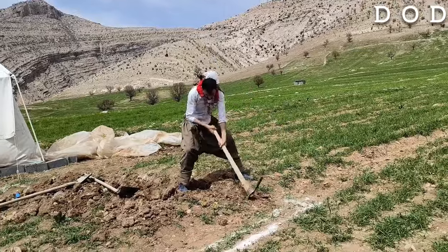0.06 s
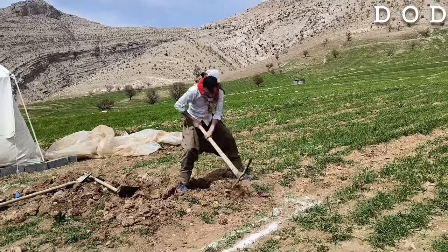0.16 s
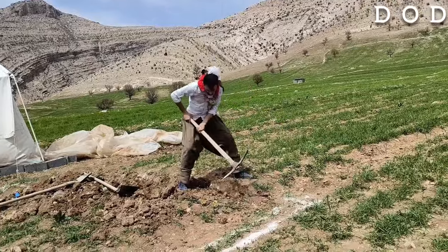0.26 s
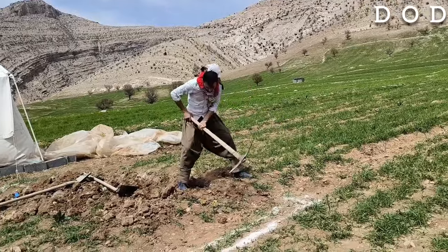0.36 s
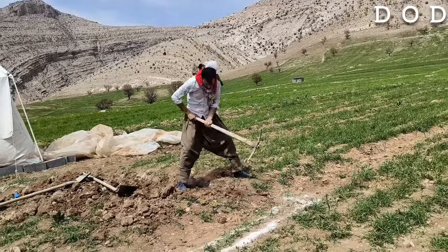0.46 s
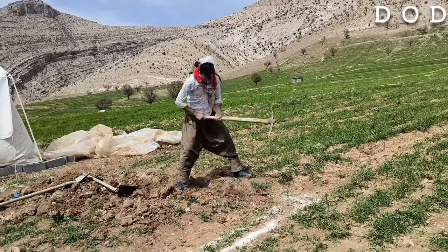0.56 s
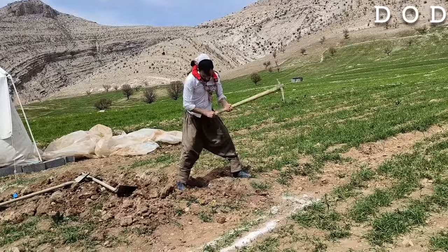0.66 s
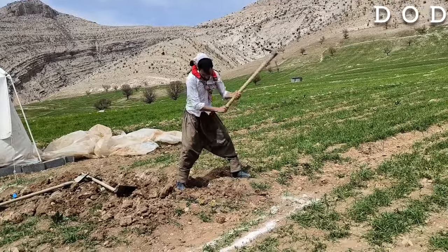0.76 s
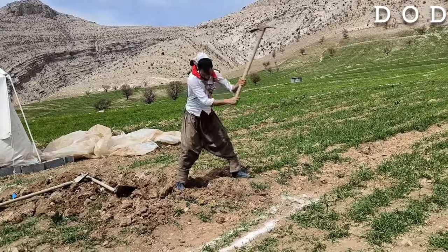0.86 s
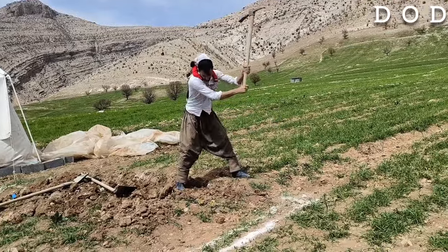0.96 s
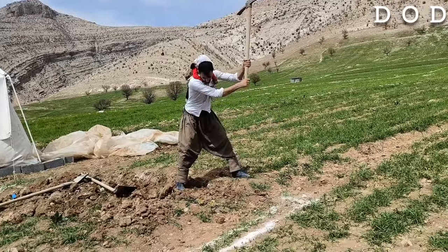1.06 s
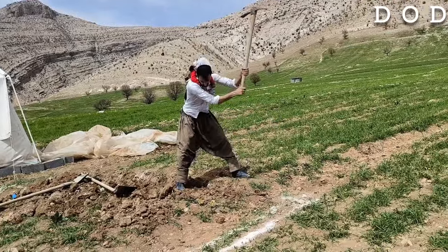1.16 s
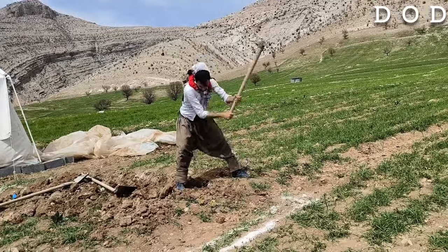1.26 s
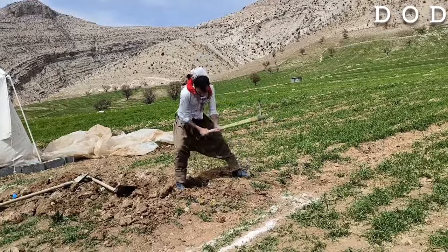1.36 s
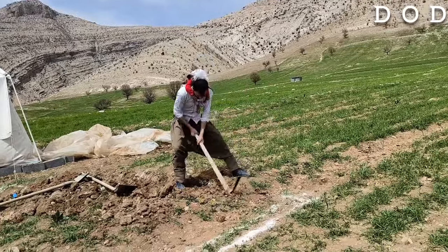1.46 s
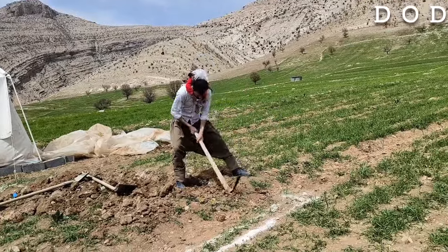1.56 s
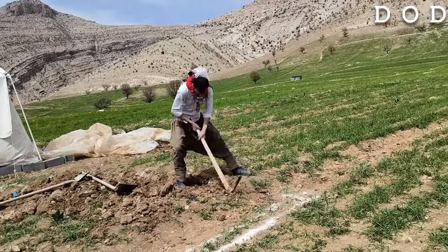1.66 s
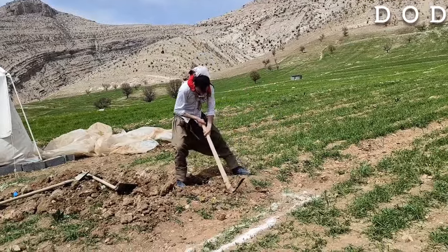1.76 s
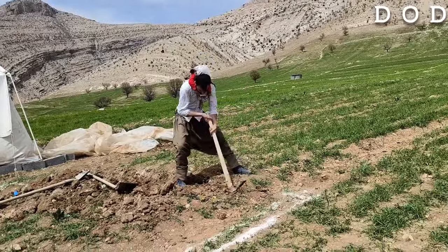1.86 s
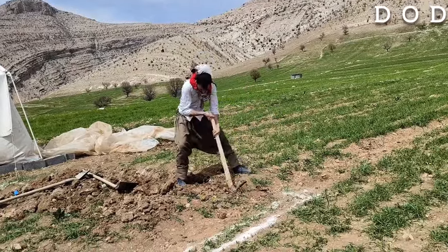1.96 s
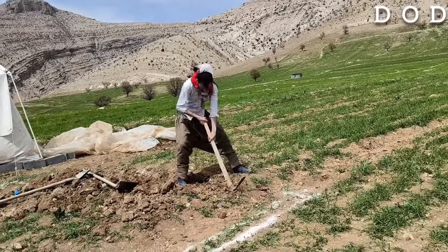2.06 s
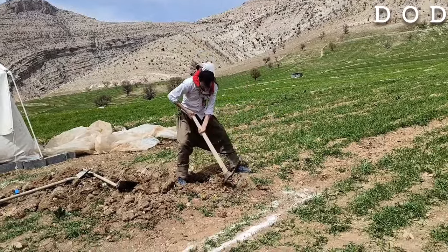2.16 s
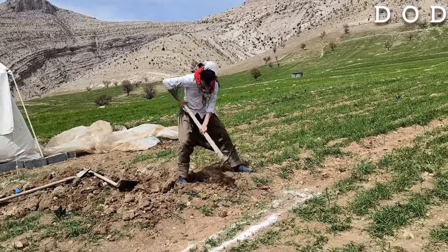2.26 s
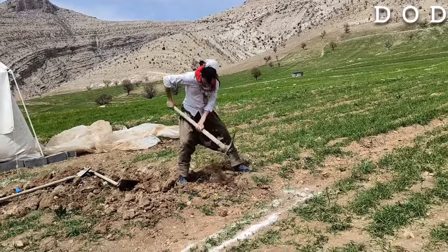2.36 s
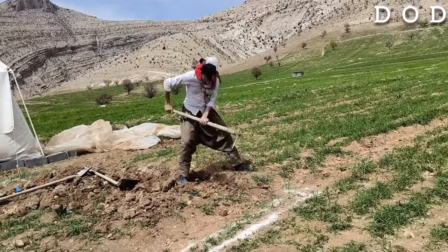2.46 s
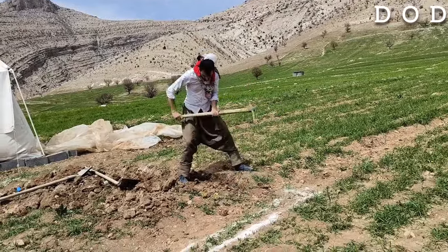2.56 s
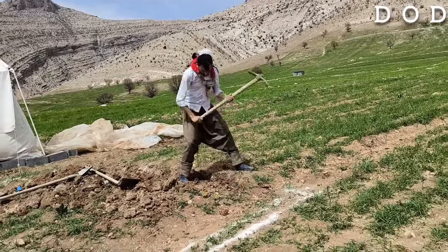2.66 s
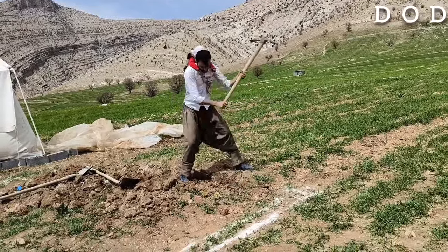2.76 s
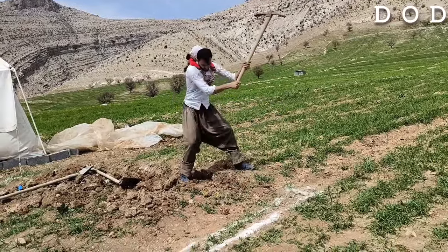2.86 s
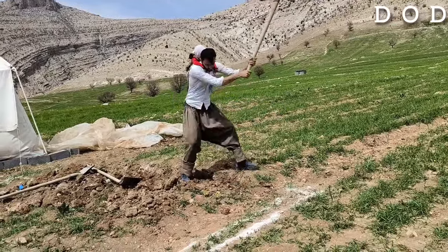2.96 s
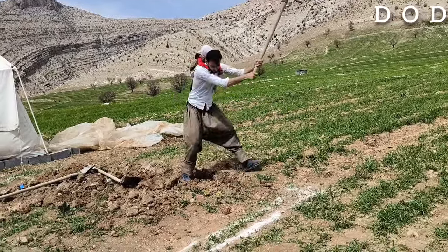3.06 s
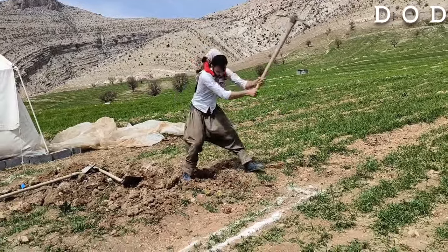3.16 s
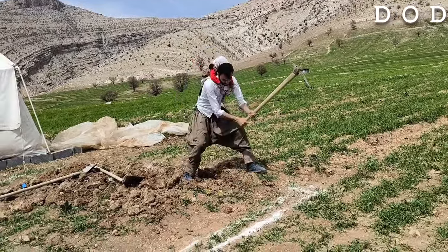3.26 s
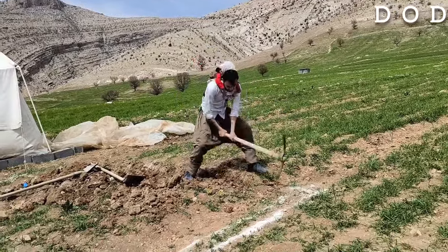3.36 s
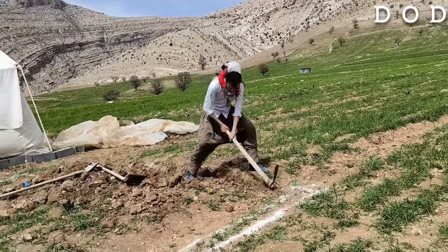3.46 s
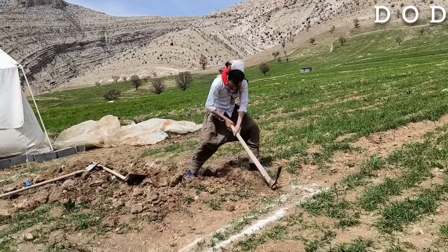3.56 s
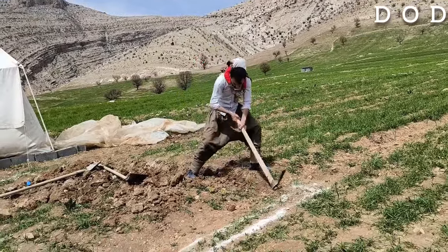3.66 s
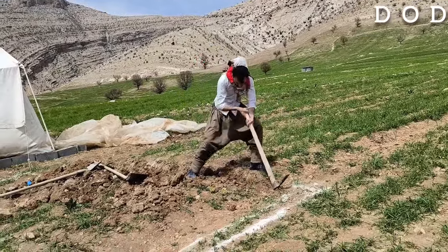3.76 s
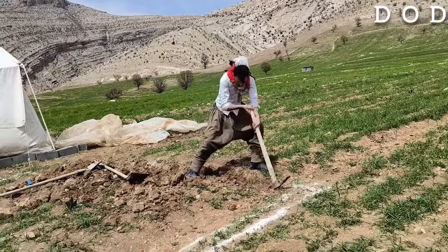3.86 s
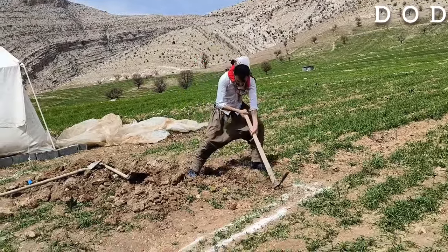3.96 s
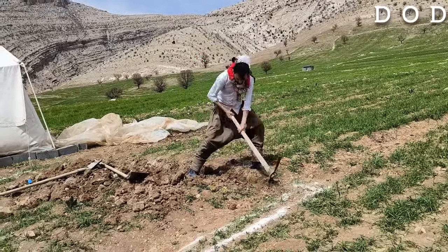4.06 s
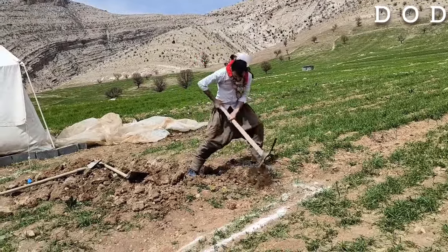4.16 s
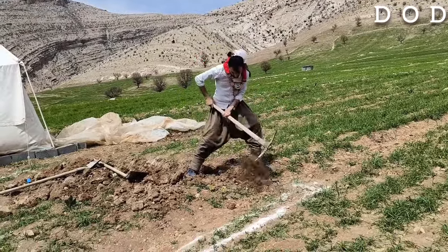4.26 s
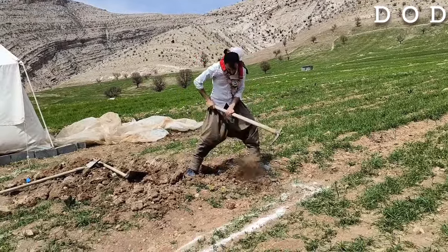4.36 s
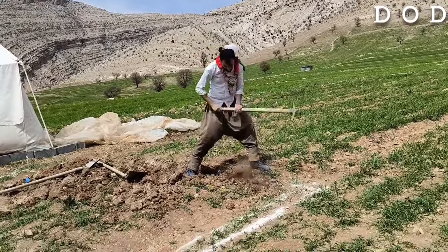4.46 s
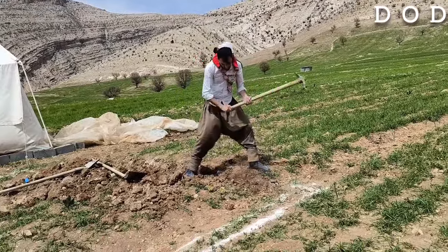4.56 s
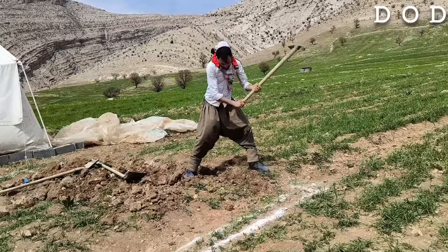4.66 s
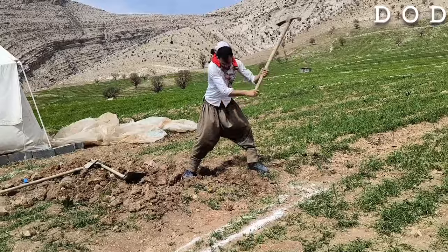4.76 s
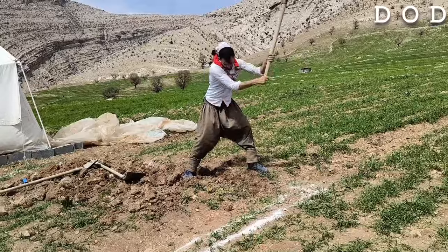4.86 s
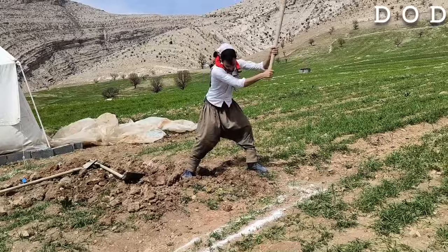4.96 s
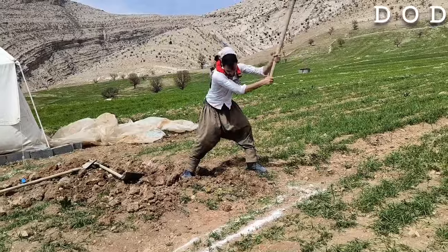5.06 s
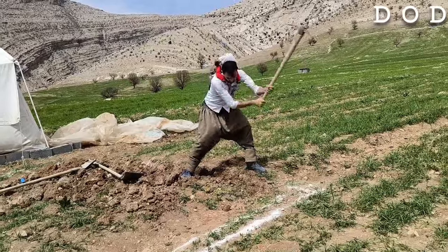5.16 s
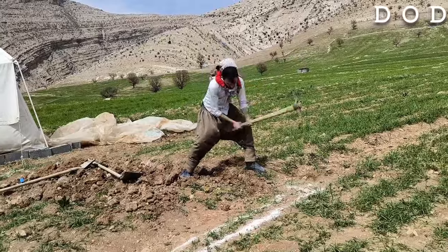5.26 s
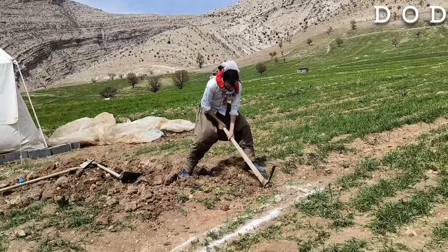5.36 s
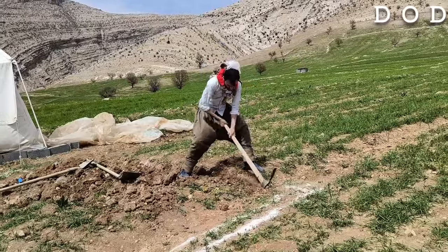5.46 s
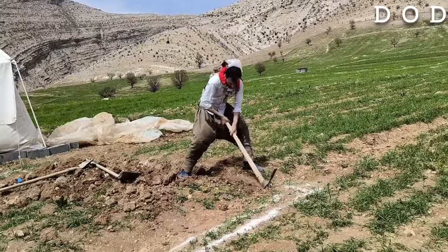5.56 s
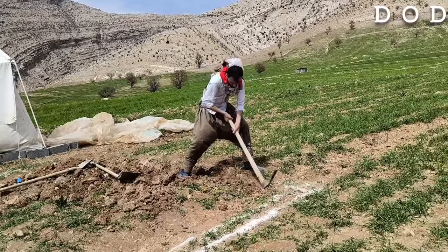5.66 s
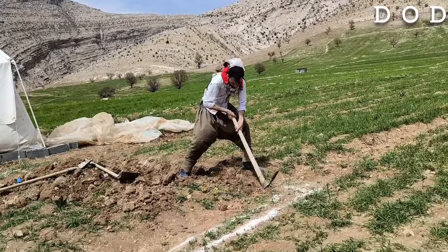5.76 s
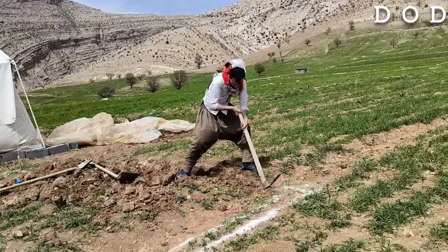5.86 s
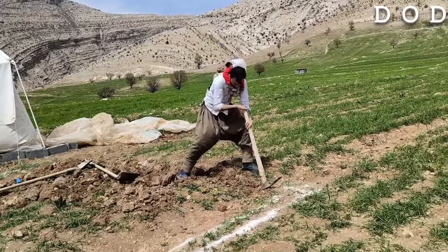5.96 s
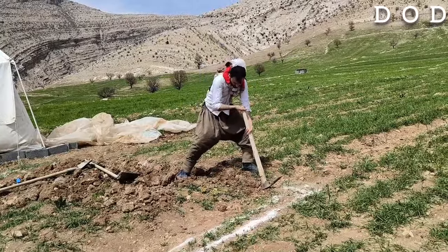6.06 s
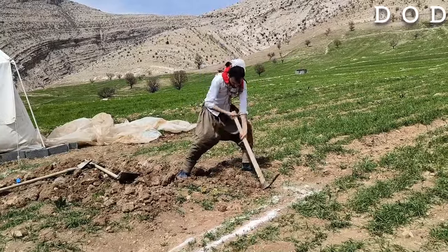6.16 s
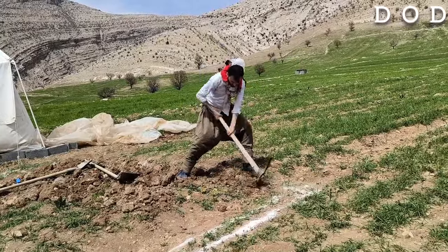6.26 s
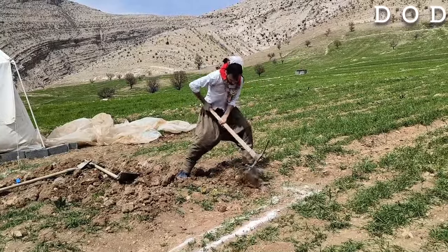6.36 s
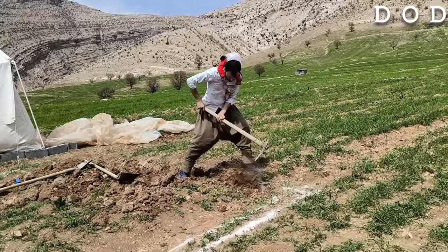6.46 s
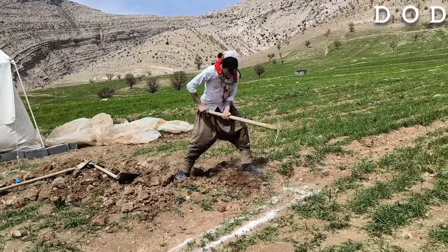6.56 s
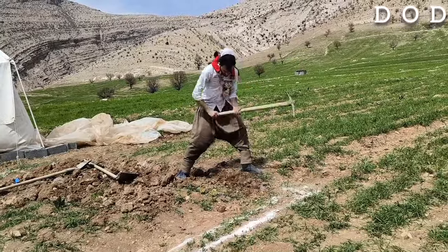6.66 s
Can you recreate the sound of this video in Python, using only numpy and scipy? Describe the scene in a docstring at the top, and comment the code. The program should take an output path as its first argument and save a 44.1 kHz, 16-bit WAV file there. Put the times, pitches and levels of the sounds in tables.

```python
"""A steel pick strikes stony soil three times on an open hillside and is levered out; grit runs off the blade.
Each stony contact is a jerky burst of noise that also rings the steel head, with a low thud through the ground.
Pebbles are short noise bursts; loose soil is many tiny clicks with an airy swish.
Wind is lumpy low noise with flutter and pops on the two ports of a hand-held phone, far harder on the left.
A faint hillside and circuit hiss lie underneath, and the phone's gain control turns loud stretches down."""
import sys
import numpy as np
from scipy import signal
from scipy.fft import rfft, irfft, next_fast_len
from scipy.io import wavfile
from scipy.ndimage import map_coordinates

SR = 44100
rng = np.random.default_rng(int(sys.argv[2]) if len(sys.argv) > 2 else 0)


def transcribe(signal):
    """Save signal, clipped to [-1, 1], as a 16-bit WAV file at the path in sys.argv[1]."""
    frames = np.atleast_2d(signal).T
    limited = np.clip(frames, -1, 1)
    pcm = np.round(limited * 32767).astype(np.int16)
    wavfile.write(sys.argv[1], SR, pcm)


N = 296384
T = np.arange(N) / SR  # time of every sample, s

# All levels below are those before the phone's own processing.
# steady part of the wind on each port: t/s, level/dB
WIND_LEFT = [(0, -35), (.12, -19.5), (.36, -14.5), (.6, -15), (.8, -16.5), (1.05, -11.5), (1.4, -19.5),
             (1.6, -20.5), (1.81, -45), (1.95, -27.5), (2.75, -27), (2.95, -34.5), (3.3, -26), (3.45, -47),
             (4.0, -68), (4.33, -31.5), (4.65, -61), (6.15, -52.5), (6.45, -31.5), (6.72, -39)]
WIND_RIGHT = [(0, -61.5), (.33, -45.5), (.42, -36), (.5, -52.5), (1.5, -44), (1.7, -43), (2.18, -66),
              (2.33, -31), (2.42, -45), (2.62, -35), (2.93, -28), (3.25, -52.5), (4.5, -69), (6.2, -62.5),
              (6.38, -40), (6.47, -51), (6.6, -35.5), (6.72, -36)]
# separate thumps of air on the windward (left) port: t/s, level/dB
THUMPS = [(0.124, -23), (.24, -14), (0.288, -10), (0.449, -5.5), (0.649, -13), (0.704, -10), (.884, -5.5),
          (1.027, -11), (1.134, -23.5), (1.28, -15.5), (1.335, -13.5), (1.459, -18), (1.559, -16),
          (2.034, -22.5), (2.12, -15.5), (2.292, -21.5), (2.43, -19.5), (2.692, -19.5), (2.86, -30),
          (3.018, -18), (3.102, -19.5), (3.229, -27.5), (3.277, -26.5), (4.051, -37.5), (4.173, -38),
          (4.328, -37), (4.467, -36), (4.598, -37.5), (5.163, -36.5), (5.887, -42.5), (6.282, -32.5),
          (6.466, -28.5), (6.613, -25), (6.644, -31), (6.689, -18)]
# single eddies that pop on one port: t/s, peak/dB, sharpness/Hz, port (0 left, 1 right)
POPS = [(0.0651, -6.5, 748, 1), (.134, -24.5, 906, 1), (0.284, -6, 383, 0), (.37, -20.5, 500, 1),
        (0.434, -4.5, 473.5, 0), (0.447, 0.5, 580, 0), (0.645, -6.5, 352.8, 0), (0.704, -5.5, 477, 0),
        (0.875, -0.5, 500, 0), (1.029, -10, 300, 0), (2.119, -21, 303.2, 0), (2.29, -13.5, 303, 0),
        (2.445, -13, 300, 0), (2.644, -22, 695, 1), (2.69, -13.5, 302, 0), (2.999, -18, 304, 0),
        (3.09, -13, 244, 0), (3.278, -15, 214, 0), (5.977, -25, 1470, 1), (6.684, -17, 296, 0)]
# colour of the low wind noise: f/Hz, level/dB
EDDIES = [(25, -75.5), (42, -70.5), (60, -0.5), (100, 9.5), (140, 6.5), (210, -0.5), (330, -25.5),
          (600, -83.5)]
# colour of the wind flutter above it: f/Hz, level/dB
FLUTTER = [(60, -26.5), (150, -6.5), (250, 5.5), (400, -6.5), (700, -31), (1200, -47.5), (3000, -77.5)]
# colour of the open hillside: f/Hz, level/dB
HILLSIDE = [(45, -15), (90, 2), (250, -4.5), (550, -4.5), (900, -16), (2000, -21.5), (4000, -21),
            (6500, -19.5), (7400, -26), (16000, -40)]
# colour of the circuit hiss: f/Hz, level/dB
CIRCUIT = [(3000, 4), (6000, 5), (7400, -13), (11000, 0), (13500, 0.5), (15500, -1)]
# loose soil and cloth in motion: centre t/s, spread/s (standard deviation), grit level/dB, swish level/dB
SOIL = [(0.168, 0.022, -56, -76), (0.302, 0.05, -58.5, -83), (.575, 0.058, -52.5, -75),
        (2.185, 0.015, -53.5, -70.5), (2.312, 0.065, -61.5, -62), (2.932, 0.069, -68, -63.5),
        (3.14, 0.019, -61, -80.5), (3.7, 0.21, -68, -76), (4.248, 0.023, -59.5, -77),
        (4.412, 0.11, -67, -67.5), (5.21, 0.027, -83, -65), (6.428, 0.021, -58.5, -76.5)]
# colour of the grit: f/Hz, level/dB
GRIT = [(300, -15.5), (900, -1), (2000, -4), (4500, 7.5), (7000, 1.5), (10000, -5.5), (16000, -24.5)]
# colour of the swish: f/Hz, level/dB
SWISH = [(4000, -22), (7500, -10), (11000, 0), (16000, -6)]
# pebbles and clods: t/s, level/dB, centre f/Hz
PEBBLES = [(.148, -46.5, 5090), (.61, -39, 6800), (1.618, -45.5, 3140), (2.1635, -38, 4270),
           (2.37, -55.5, 1980), (2.42, -48, 3050), (4.105, -49.5, 10940), (4.39, -44.5, 3070),
           (6.333, -38.5, 1275), (6.44, -48.5, 1590)]
# the point meets stone after stone as it sinks: t/s, level/dB, hardness/(dB per octave), t60/s, head ring/dB
CONTACTS = [(1.5061, -10, 3.5, 0.012, -27.5), (1.511, -12, -3.5, 0.055, -24.5),
            (1.5147, -12.5, 1, 0.042, -22), (1.5188, -8.5, 3, 0.022, -18), (1.538, -31.5, 4.5, 0.05, -28.5),
            (3.464, -29.5, 1.5, 0.036, -32.5), (3.4716, -5.5, 1.7, 0.013, -21), (3.477, -18, 0, 0.028, -21),
            (3.495, -34.5, 7, .03, -29.5), (5.4158, -8.5, 3, .01, -28), (5.419, -21.5, 2.5, .06, -23.5),
            (5.427, -17.5, -6.5, 0.024, -18), (5.439, -28.5, 3, 0.027, -24)]
# ringing notes of the steel head: f/Hz, level/dB, t60/s
HEAD_MODES = [(1990, -13, .024), (2340, -8, .013), (2720, -9, .018), (4350, -9, .016), (5820, -4, .019),
              (9705, -27, .11), (12070, -32, .035), (14000, -30, .045)]
# colour of crushed stone: f/Hz, level/dB
CRUSH = [(70, -32), (200, -4.5), (500, -4.5), (1200, -26.5), (3000, 1.5), (6000, 0), (8000, -1.5),
         (12000, -14), (16000, -23.5)]
# the blow arriving through the ground: t/s, level/dB
THUDS = [(1.5282, -18.5), (3.49, -23), (5.446, -20.5)]
# colour of each microphone port: f/Hz, level/dB
PORT_LEFT = [(300, 3.5), (2000, 0.5), (3400, -3), (4300, -1.5), (5000, -0.5), (5900, -9), (7400, -11.5),
             (8300, 9.5), (9200, -3.5), (16000, 6)]
PORT_RIGHT = [(300, 6.5), (1000, 5.5), (2200, 17.5), (2800, 10.5), (3600, 1.5), (4800, -5.5), (5900, 8.5),
              (6700, 3.5), (8300, -18.5), (10000, 3.5), (16000, -5)]
# how far the right port lags in phase (below zero it leads): f/Hz, lag/radians
LAG = [(100, -1.5), (700, 0.12), (1800, -2.1), (3000, 2.5), (3900, 4.5), (7500, 6), (9000, 3.5),
       (15500, 5.5)]

THUMP_S = 0.012  # standard deviation of a thump's bell shape, s
RISE_S = 0.0005  # time constant of a stone contact's start, s
SPRAY_DB, SPRAY_S = -44.5, 0.15  # soil thrown up by a blow: level in dB, t60 in s
TOP_HZ = 15850  # nothing is kept from here up


def amp(db):
    """Turns decibels into gain."""
    return 10 ** (np.asarray(db) / 20)


def unit(x):
    """Scales a sound to rms 1."""
    return x / np.sqrt(np.mean(x ** 2, -1, keepdims=True) + 1e-20)


def along(points, hz):
    """Reads a table of (f/Hz, value) at any frequency, on a log axis."""
    f, v = np.transpose(points)
    return np.interp(np.log(hz + 1), np.log(f + 1), v)


def curve(rows):
    """Joins (t/s, value) rows by straight lines, one value per sample."""
    return np.interp(T, *np.transpose(rows))


def wobble(rate):
    """A smooth random curve through rate random points a second."""
    return map_coordinates(rng.standard_normal(N // 100), [T * rate], mode='wrap')


def filtered(x, response):
    """Multiplies the spectrum of x by a response that depends on frequency."""
    size = next_fast_len(x.shape[-1] + 8192)
    spectrum = rfft(x, size) * response(np.fft.rfftfreq(size, 1 / SR))
    return irfft(spectrum, size)[..., :x.shape[-1]]


def coloured(x, colour):
    """Shapes x by a colour table of f/Hz, level/dB."""
    return filtered(x, lambda hz: amp(along(colour, hz)))


def noise(colour, size=N):
    """Coloured noise of rms 1."""
    return unit(coloured(rng.standard_normal(size), colour))


def noise_pair(colour):
    """Separate noise of the same colour for left and right."""
    return np.array([noise(colour), noise(colour)])


def add(track, s, sound):
    """Mixes a sound into the track at time s."""
    part = track[..., round(s * SR):][..., :len(sound)]
    part += sound[:part.shape[-1]]


def bells(rows, column):
    """Adds up the bell-shaped swells in one level column of a soil table."""
    return sum(amp(row[column]) * np.exp(-.5 * ((T - row[0]) / row[1]) ** 2) for row in rows)


def buffet(rows, thumps):
    """Lumpy low noise under steady wind and thumps; the stronger the gust, the more flutter on top."""
    swells = sum(amp(db) * np.exp(-.5 * ((T - s) / THUMP_S) ** 2) for s, db in thumps)
    gust_db = 20 * np.log10(amp(curve(rows)) + swells)
    lumps_db = 6 * np.tanh(wobble(rate=50) / 2)
    low = unit(amp(lumps_db) * noise(EDDIES))
    flutter = unit(amp(lumps_db + 4.44 * wobble(rate=110)) * noise(FLUTTER))
    flutter_gain = amp(0.71 * gust_db + 0.6)
    return amp(gust_db) * (low + flutter_gain * flutter)


def wind():
    """Each port has its own turbulence; a pop is a quick push of air and a weaker rebound."""
    both = np.array([buffet(WIND_LEFT, THUMPS), buffet(WIND_RIGHT, [])])
    t = np.arange(SR // 20) / SR
    for s, db, hz, port in POPS:
        u = 2 * np.pi * hz * t
        push = -(u / 3) ** 3 * np.exp(3 - u)
        rebound = 0.2 * (1 - np.exp(-u / 2)) ** 2 * np.sin(2 * np.pi * 130 * t) * amp(-60 * t / 0.053)
        # starts half a cycle early, so the push peaks close to time s
        add(both[int(port)], s - .5 / hz, amp(db) * (push + rebound))
    return both


def hillside():
    """Faint open-air noise, partly shared by the two sides."""
    return amp(-61.5) * (noise_pair(HILLSIDE) + 0.44 * noise(HILLSIDE))


def circuit_hiss():
    """Steady electrical hiss, separate on each side."""
    return amp(-65.5) * noise_pair(CIRCUIT)


def grains(per_s, cycles):
    """Tiny stones click at random: each a short note, dying by 60 dB over the given number of cycles."""
    when, pitch, size = rng.random((3, round(per_s * N / SR)))
    k = np.arange(128)  # samples in one click
    turns = 1200 * 12 ** pitch[:, None] * k / SR  # notes from 1200 to 14400 Hz
    click_db = -3.5 * np.log(size[:, None] + .01) - 60 * turns / cycles
    notes = amp(click_db) * np.sin(2 * np.pi * turns)
    places = (when[:, None] * N).astype(int) + k
    return unit(np.bincount(places.ravel(), notes.ravel())[:N])


def soil():
    """Swells of clumped grit and airy swish; each blow also throws up a fading spray of grit."""
    clumps = amp(2.5 * wobble(rate=70))
    grit = unit(coloured(clumps * grains(3500, 20), GRIT))
    falling = sum((T > s) * amp(SPRAY_DB - 60 * abs(T - s) / SPRAY_S) for s, _ in THUDS)
    spray = unit(np.gradient(grains(2500, 25)))  # the gradient brightens it
    swish = bells(SOIL, column=3) * noise_pair(SWISH)
    return bells(SOIL, column=2) * grit + falling * spray, swish


def pebbles():
    """Small knocks: short bursts of noise in a broad band."""
    out, t = np.zeros(N), np.arange(SR // 10) / SR
    for s, db, hz in PEBBLES:
        colour = [(hz / 6, -26), (hz / 2, 0), (hz * 1.8, 0), (hz * 3, -24)]
        add(out, s, amp(db - 60 * t / 0.016) * noise(colour, len(t)))
    return out


def steel_head(t):
    """The head's ringing notes, each dying at its own pace, with levels varied a little per contact."""
    spread_db = rng.normal(0, 2, len(HEAD_MODES))
    return sum(amp(db + extra - 60 * t / t60) * np.sin(2 * np.pi * hz * t)
               for (hz, db, t60), extra in zip(HEAD_MODES, spread_db))


def stone_contact(t, hardness, t60, ring_db):
    """Grinding stone makes a noisy force, which also drives the steel head; hard stone sounds brighter."""
    force = (1 - np.exp(-t / RISE_S)) * amp(-60 * t / t60) * rng.standard_normal(len(t))
    force = force * amp(2 * wobble(rate=400)[:len(t)])  # the stone gives way in jerks
    ring = amp(ring_db) * signal.fftconvolve(force, steel_head(t))[:len(t)]
    crush = coloured(force, CRUSH)
    return filtered(crush + ring, lambda hz: amp(hardness * np.log2((hz + 500) / 2800)))


def ground_thuds():
    """The ground answers each blow with a low note that starts softly and dies fast."""
    ground, t = np.zeros(N), np.arange(SR // 4) / SR
    for s, db in THUDS:
        note = (1 - np.exp(-t / 0.0021)) * np.sin(2 * np.pi * 132 * t)
        add(ground, s, amp(db - 60 * t / 0.068) * note)
    return ground


def pick():
    """Stone contacts with an echo, and the ground thudding a moment later."""
    out, t = np.zeros(N), np.arange(SR // 4) / SR
    for s, db, hardness, t60, ring_db in CONTACTS:
        add(out, s, amp(db) * stone_contact(t, hardness, t60, ring_db))
    # a tent wall on the left returns the treble 53.5 ms later
    echo = np.diff(np.pad(out, (round(.0535 * SR), 1)))[:N]
    return out + amp([[-25], [-32]]) * echo + ground_thuds()


def port_response(hz):
    """Each port colours the sound its own way, and the right one is shifted in phase."""
    colour = amp([along(PORT_LEFT, hz), along(PORT_RIGHT, hz)])
    return colour * [hz ** 0, np.exp(-1j * along(LAG, hz))]


def scattered(near):
    """Adds a short noisy tail that differs between left and right."""
    t = np.arange(SR // 20) / SR
    tail = rng.standard_normal((2, len(t))) * amp(-60 * t / 0.077)
    tail = tail / np.linalg.norm(tail[0])
    return near + amp(-15) * signal.fftconvolve(near, tail, axes=1)[:, :N]


def scene():
    """Pick, pebbles, grit and hillside pass the ports; swish, hiss and wind are added after them."""
    grit, swish = soil()
    near = scattered(pick() + pebbles() + grit)
    return filtered(near + hillside(), port_response) + swish + circuit_hiss() + wind()


def record(dry):
    """Gain control slowly follows the louder channel, then come soft clipping and a band limit."""
    step = 1 - np.exp(-1 / (.4 * SR))  # 0.4 s time constant
    power = signal.lfilter([step], [1, step - 1], np.max(dry ** 2, 0))
    over_db = np.maximum(10 * np.log10(power + 1e-12) + 25, 0)  # dB above -25 dB
    x = dry * amp(-.35 * over_db)
    x = x / (1 + abs(x / 0.81) ** 6) ** (1 / 6)  # peaks flatten towards 0.81
    # rumble below about 62 Hz fades away
    return filtered(x, lambda hz: (hz < TOP_HZ) / np.sqrt(1 + (62 / (hz + 1)) ** 5))


dry = scene()
out = record(dry)
transcribe(out)
```